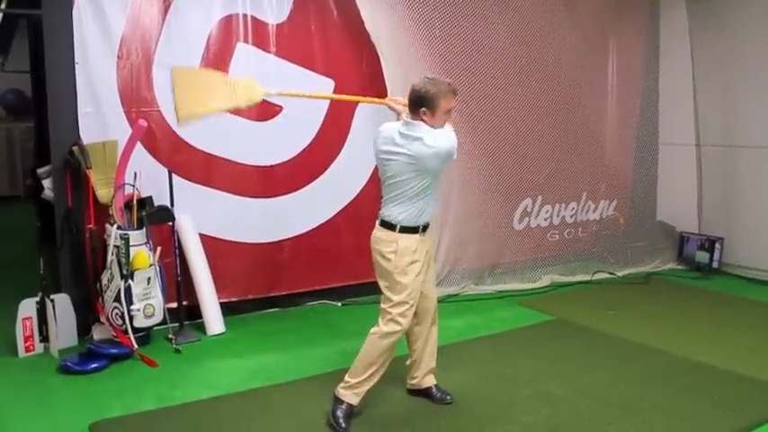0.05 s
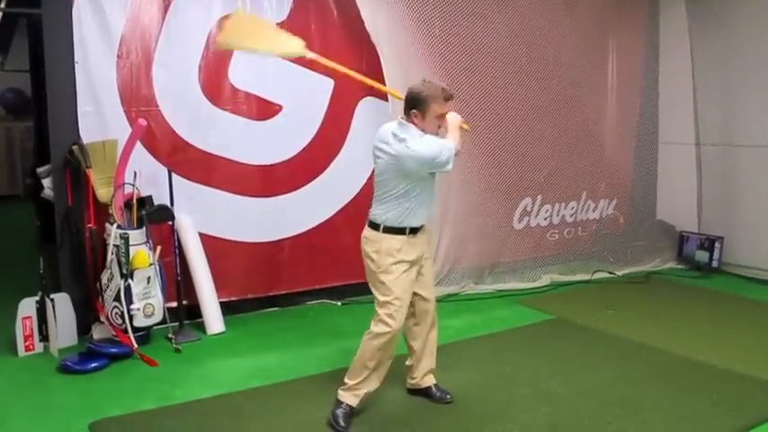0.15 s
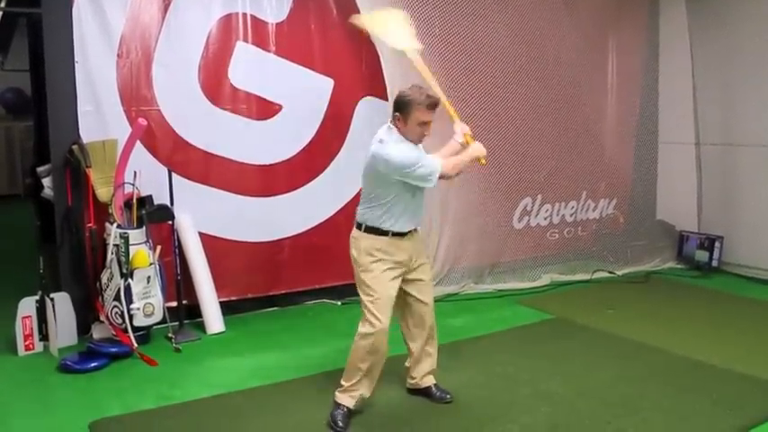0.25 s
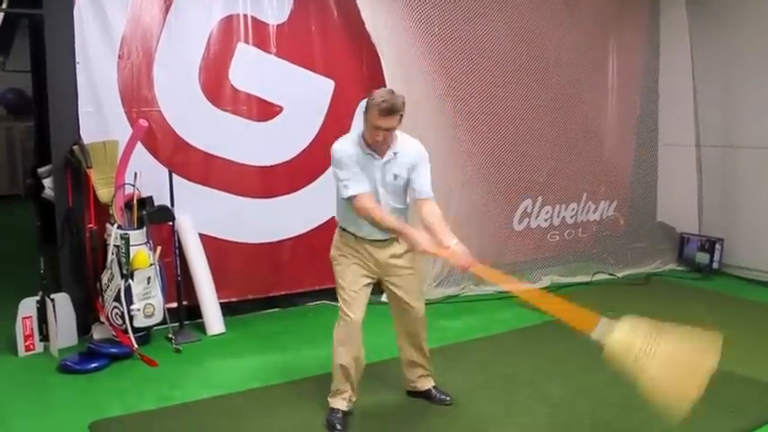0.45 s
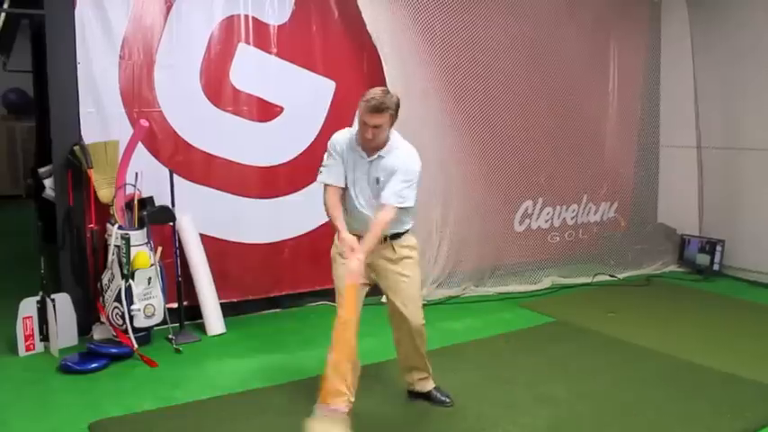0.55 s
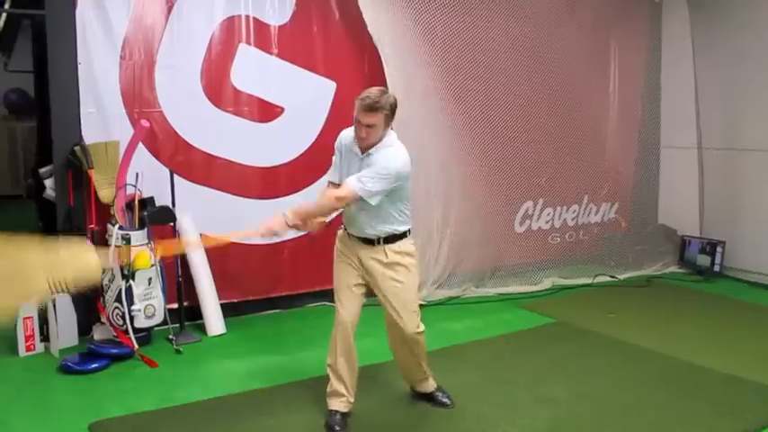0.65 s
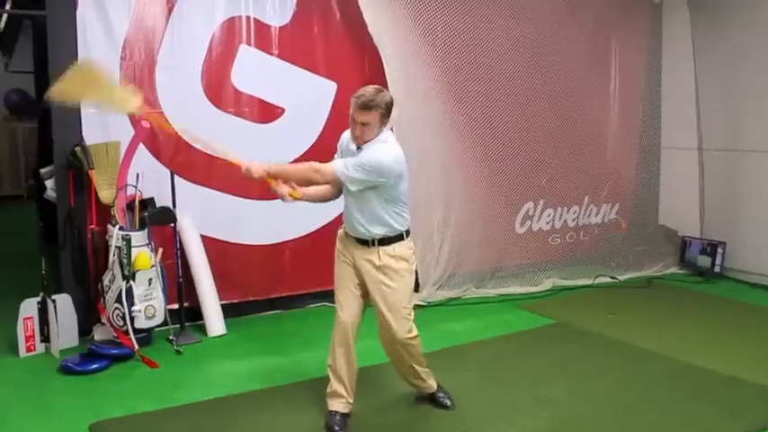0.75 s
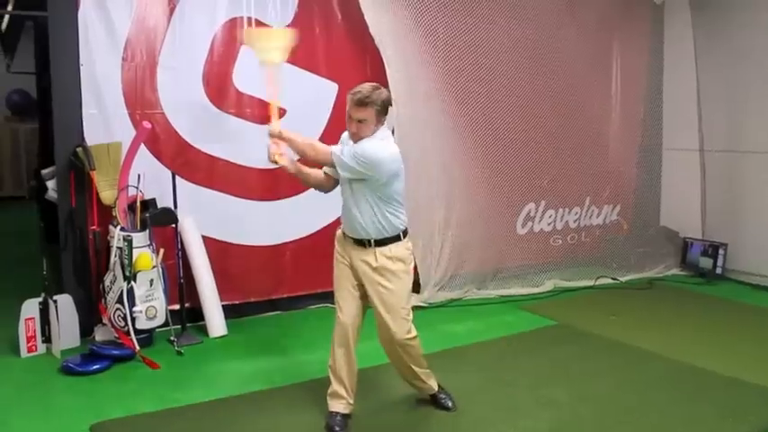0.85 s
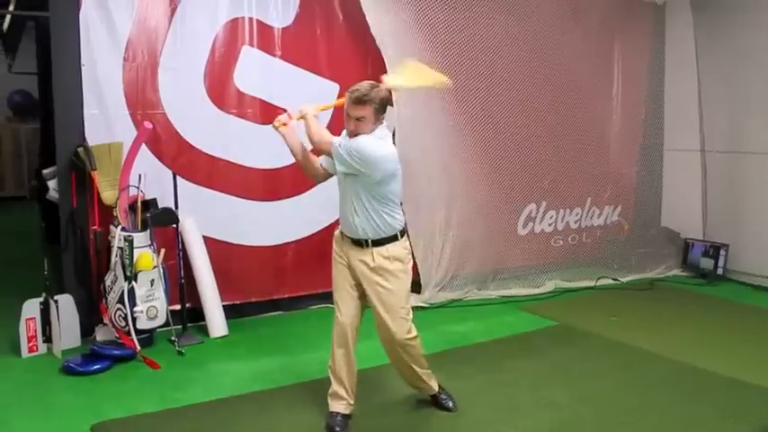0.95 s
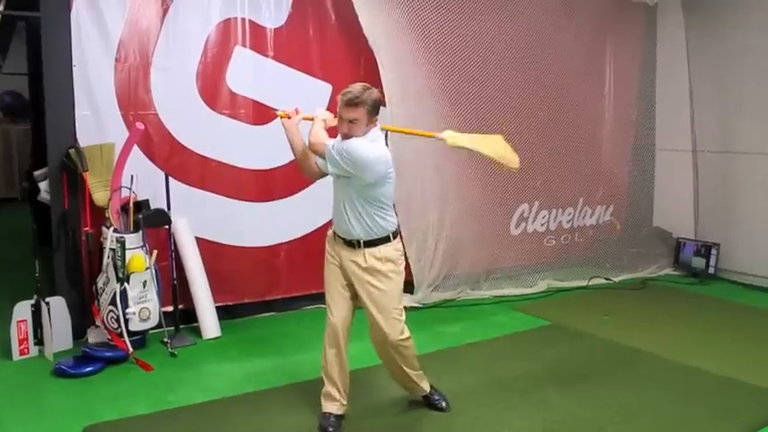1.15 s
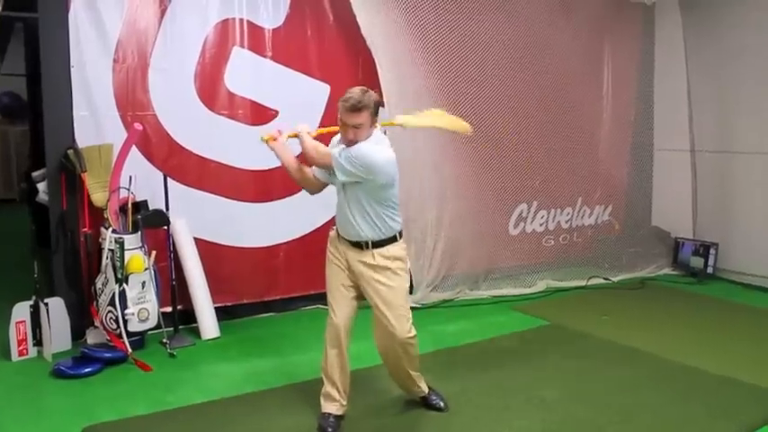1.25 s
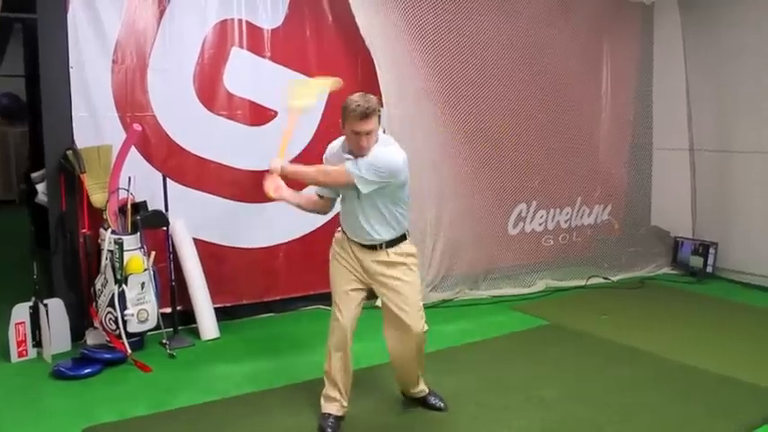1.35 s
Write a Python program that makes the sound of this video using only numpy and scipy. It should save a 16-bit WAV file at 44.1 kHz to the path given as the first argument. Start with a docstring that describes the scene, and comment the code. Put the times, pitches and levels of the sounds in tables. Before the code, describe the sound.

A straw broom swings hard through the air with one loud, breathy whoosh in a reverberant room

```python
"""A straw broom swung hard through the air hisses, whistles and roars, a few metres from a camera.
The straws are vortex noise that grows louder and higher with speed; the head adds a lower roar and a puff.
The binding creaks as a few ringing slips as the swing turns round; straws rustle as grainy noise and snap.
A reverberant practice room answers with decaying noise, over ventilation noise and a faint mains hum.
The camera adds a hiss to each channel and cuts the top."""
import sys
import numpy as np
from scipy import signal
from scipy.fft import rfft, irfft, next_fast_len
from scipy.io import wavfile
from scipy.ndimage import uniform_filter1d, map_coordinates

SR = 44100
rng = np.random.default_rng(int(sys.argv[2]) if len(sys.argv) > 2 else 0)


def unload_wav(signal):
    """Save mono or channel-first audio to the path in sys.argv[1] as 16-bit WAV at rate SR, clipped to [-1, 1]."""
    wavfile.write(
        sys.argv[1],
        SR,
        np.round(np.clip(np.atleast_2d(signal).T, -1, 1) * 32767).astype(np.int16),
    )


N = 61739

# colour of dry straws rubbing and snapping: (frequency [Hz], density [dB per Hz, relative])
DRY_STRAW = [(300, -30), (1700, -2.5), (3500, -1.5), (6000, 1), (8700, 2), (11500, -14), (16000, -19)]


def amp(db):
    """Decibels to gain."""
    return 10 ** (np.asarray(db) / 20)


def unit(x):
    """Scale to rms 1."""
    return x / np.sqrt(np.mean(x ** 2) + 1e-20)


def clock():
    """Time of each sample [s]."""
    return np.arange(N) / SR


def along(points, hz):
    """Read (frequency, value) points on a log frequency axis."""
    f, value = np.transpose(points)
    return np.interp(np.log(hz + 1), np.log(f + 1), value)


def wobble(rate):
    """A smooth random curve, rate knots a second."""
    return map_coordinates(rng.standard_normal(256), [clock() * rate], mode="wrap")


def swell(s, width):
    """A bell-shaped rise and fall around a moment; width is its standard deviation [s]."""
    return np.exp(-.5 * ((clock() - s) / width) ** 2)


def filtered(x, response):
    """x times a response of frequency, padded so that nothing wraps round."""
    m = next_fast_len(N + SR // 2)
    return irfft(rfft(x, m) * response(np.fft.rfftfreq(m, 1 / SR)), m)[..., :N]


def coloured(x, spectrum):
    """x through a spectrum that keeps the power of white noise."""
    return filtered(x, lambda hz: unit(amp(along(spectrum, hz))))


def noise(spectrum):
    """Steady coloured noise of about rms 1."""
    return coloured(rng.standard_normal(N), spectrum)


def ventilation():
    """Turbulent air in the ventilation: steady coloured noise."""
    # (frequency [Hz], density [dB per Hz, relative])
    air = [(25, -25), (80, -12.5), (180, -6), (320, -2.5), (600, 0), (1200, -3), (2500, -4.5), (5000, -8.5),
           (9000, -8.5), (12000, -15.5), (16000, -22)]
    return amp(-42) * noise(air)  # dB rms


def mains_hum():
    """Mains harmonics, each wavering in level and spread in phase into a smooth hum."""
    # harmonics: (frequency [Hz], level [dB rms])
    lines = [(240, -47.5), (360, -43.5), (480, -45.5), (540, -54), (840, -59.5), (900, -58.5), (960, -56),
             (1680, -60), (1800, -55.5)]
    waver_db, buzz_hz = 0.84, 120
    hum = np.zeros(N)
    for hz, db in lines:
        level = amp(db + waver_db * wobble(7))
        phase = np.pi / 2 * (hz / buzz_hz) ** 2
        hum += level * np.sin(2 * np.pi * hz * clock() + phase)
    return np.sqrt(2) * hum  # rms to peak


def room(x):
    """The room's answer: each frequency dies at its own speed, and the echoes change as the broom moves."""
    # decay: (frequency [Hz], time to fall 60 dB [s])
    decay = [(100, 0.91), (500, 0.89), (2000, 1.5), (5000, 1.03), (9000, 1.02), (15000, 0.63)]
    delay_s, renew_s = .012, .1
    out = np.zeros(N)
    for s in np.arange(0, N / SR + renew_s, renew_s):
        hz, t, z = signal.stft(rng.standard_normal(SR), SR, nperseg=256)
        fade = amp(-60 * t / along(decay, hz)[:, None])
        tail = signal.istft(z * fade, SR, nperseg=256)[1]
        tail = np.pad(tail / np.linalg.norm(tail), (int(delay_s * SR), 0))
        # neighbouring tails cross-fade at equal power
        share = np.sqrt(np.maximum(1 - np.abs(clock() - s) / renew_s, 0))
        out += signal.fftconvolve(x * share, tail)[:N]
    return out


def straw_snaps():
    """Single straws snap against each other: noise bursts with a sudden start and a 5 ms decay."""
    # snaps: (time [s], level [dB])
    ticks = [(1.1345, -31), (1.171, -28.5), (1.178, -35), (1.1835, -29), (1.2008, -31), (1.3625, -38),
             (1.37, -29)]
    t, t60 = clock(), .005
    envelope = sum(amp(db - 60 * np.abs(t - s) / t60) * (t >= s) for s, db in ticks)
    return coloured(rng.standard_normal(N) * envelope, DRY_STRAW)


def rustle():
    """The flexing bundle rubs straw on straw: dense small grains of noise that swell and fade."""
    # swells: (time [s], standard deviation [s], level [dB rms])
    rustles = [(0.017, 0.13, -50), (0.243, .025, -42.5), (1.133, 0.018, -42.5), (1.35, 0.02, -40.5)]
    grain_db = 5.7 * unit(uniform_filter1d(rng.standard_normal(N), size=60))
    grains = unit(rng.standard_normal(N) * amp(grain_db))
    envelope = sum(amp(db) * swell(s, width) for s, width, db in rustles)
    return coloured(grains * envelope, DRY_STRAW)


def creak():
    """A few quick slips of the binding, each ringing its decaying modes slightly detuned."""
    # slips as the swing turns round: (time [s], level [dB])
    slips = [(.216, -32), (.2225, -29.5), (.228, -33)]
    # modes of the binding: (frequency [Hz], level [dB], time to fall 60 dB [s])
    modes = [(3300, -7, 0.036), (3800, 0, 0.018), (4440, 2.5, 0.011), (4920, -1.5, .025)]
    out = np.zeros(N)
    for s, db in slips:
        t = np.maximum(clock() - s, 0)  # the sine stays silent until the slip
        for hz, level, t60 in modes:
            detune = 1 + 0.016 * rng.standard_normal()
            out += amp(db + level - 60 * t / t60) * np.sin(2 * np.pi * hz * detune * t)
    return out


def puff():
    """The head pushes air aside: low noise that swells once as it passes the nearest point."""
    # (frequency [Hz], density [dB per Hz, relative])
    pushed_air = [(45, -35), (70, -13), (90, 10.5), (125, -3), (180, 6), (280, 2.5), (450, 8), (650, 4),
                  (1000, -30)]
    return amp(-33) * swell(.593, .042) * noise(pushed_air)


def eddies(shape_db, loud_power, pitch_power):
    """Vortex noise whose spectrum slides up, and whose level grows, with the speed of the head."""
    # swing of the head: (time [s], speed [share of top speed])
    swing = [(0, 0.31), (.13, 0.28), (.25, 0.5), (.36, 0.59), (.44, 0.67), (.51, 0.87), (.565, 0.99),
             (.61, 0.91), (.68, 0.78), (.76, 0.63), (.86, 0.53), (1.0, 0.24), (1.12, 0.093), (1.27, 0.046),
             (1.35, 0.18), (1.4, 0.41)]
    hz, t, z = signal.stft(rng.standard_normal(N), SR, nperseg=512)
    speed = np.clip(np.interp(t, *np.transpose(swing)), .01, None)
    gain = amp(shape_db(hz[:, None] / speed ** pitch_power))
    gain = gain / np.sqrt(np.mean(gain ** 2, axis=0))  # only speed sets the level
    return signal.istft(z * gain * speed ** loud_power, SR, nperseg=512)[1][:N]


def head_wake():
    """The whole head sheds larger eddies: a lower roar whose pitch hardly follows the speed."""
    # at top speed: (frequency [Hz], density [dB per Hz, relative])
    wake = [(130, -33), (220, -11.5), (420, -1), (750, -2), (1300, -1), (2500, -8.5), (6000, -22.5)]
    return amp(-30) * eddies(lambda hz: along(wake, hz), loud_power=1.2, pitch_power=0.05)


def straw_swish():
    """Thin straws shed fast eddies: a broad hiss with narrow whistles from the commonest widths."""
    # hiss at top speed: (frequency [Hz], density [dB per Hz, relative])
    hiss_points = [(200, -26.5), (900, -14), (1600, -3.5), (2300, 2.5), (3300, 1), (4300, 0), (5500, -1.5),
                   (6600, -3), (9000, -6), (12500, -12.5), (16000, -26)]
    # whistles at top speed: (frequency [Hz], two standard deviations [Hz], height over the hiss [dB])
    whistles = [(2200, 350, 0.5), (4175, 200, 4), (5300, 650, 2.5)]

    def shape_db(hz):
        """Hiss and whistle peaks in dB."""
        peaks = sum(db * np.exp(-2 * ((hz - centre) / width) ** 2) for centre, width, db in whistles)
        return along(hiss_points, hz) + peaks

    return amp(-17) * eddies(shape_db, loud_power=3.21, pitch_power=0.7)


def scene():
    """The broom, its echo and the room's own sound, alike in both channels."""
    swish = straw_swish() + head_wake() + puff()
    broom = swish + creak() + rustle() + straw_snaps()
    echo = amp(-4) * room(broom)
    return np.tile(broom + echo + mains_hum() + ventilation(), (2, 1))


def record(dry):
    """Each channel's electronics add their own faint hiss; the camera keeps nothing above its band limit."""
    # electronics: (frequency [Hz], density [dB per Hz, relative])
    electronics = [(25, 34.5), (100, 5), (400, 3), (1500, -18), (4000, -19), (8000, -14), (15000, 4.5)]
    hiss_db, top_hz = -51.5, 15750  # hiss in dB rms ahead of the band limit
    hiss = amp(hiss_db) * np.array([noise(electronics), noise(electronics)])
    return filtered(dry + hiss, lambda hz: hz < top_hz)


dry = scene()
out = record(dry)
unload_wav(out)
```